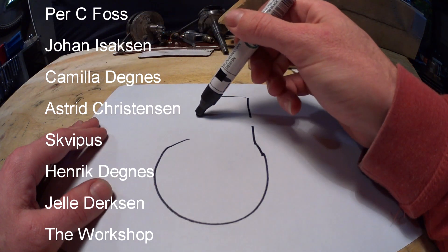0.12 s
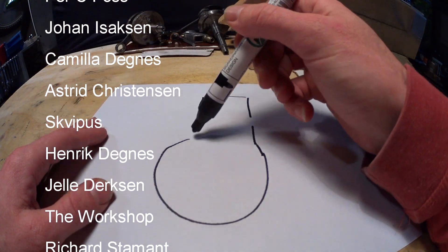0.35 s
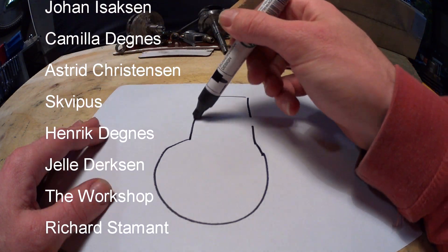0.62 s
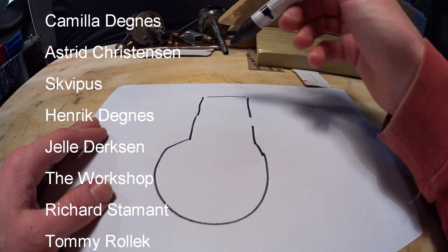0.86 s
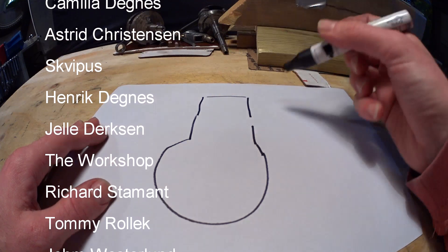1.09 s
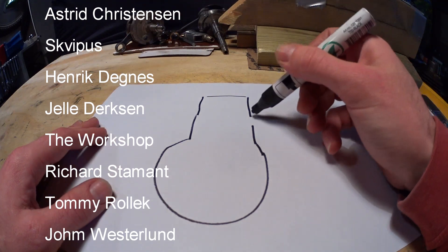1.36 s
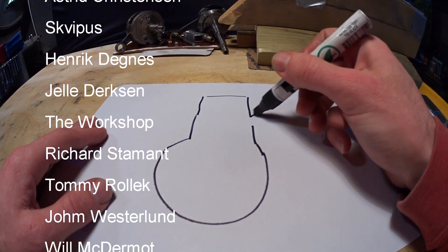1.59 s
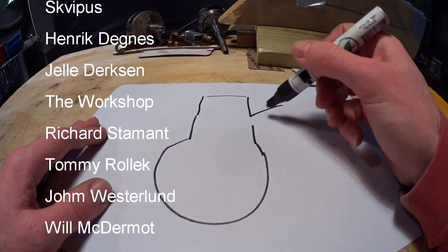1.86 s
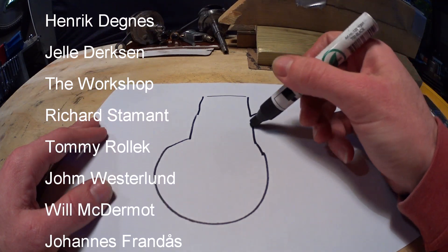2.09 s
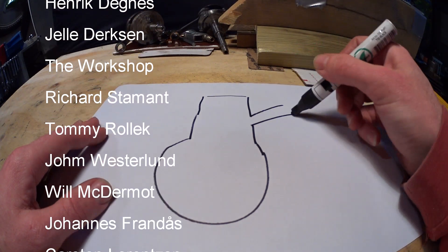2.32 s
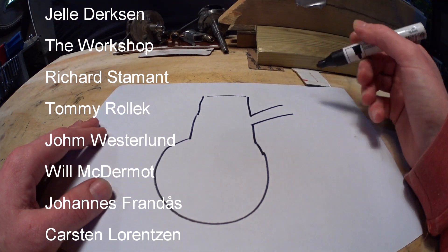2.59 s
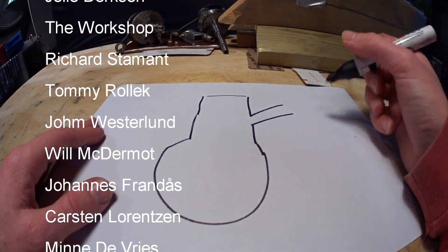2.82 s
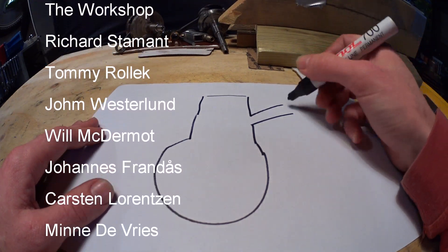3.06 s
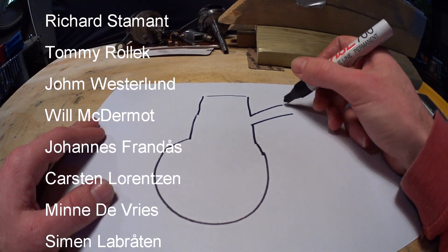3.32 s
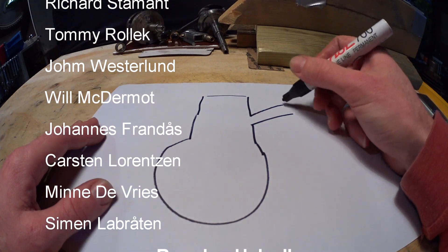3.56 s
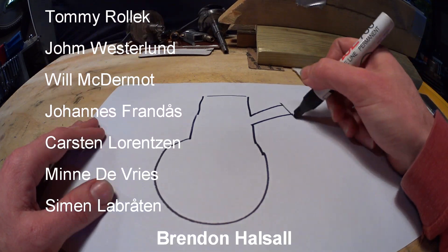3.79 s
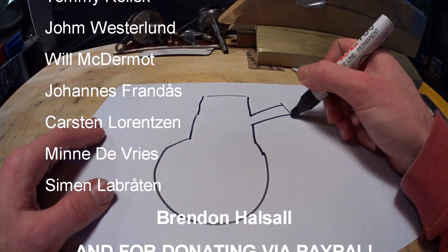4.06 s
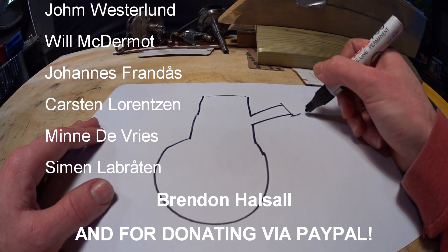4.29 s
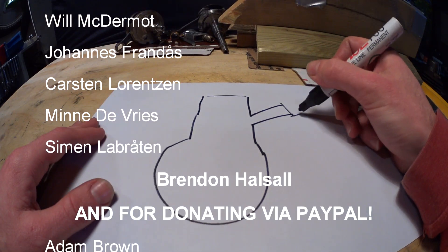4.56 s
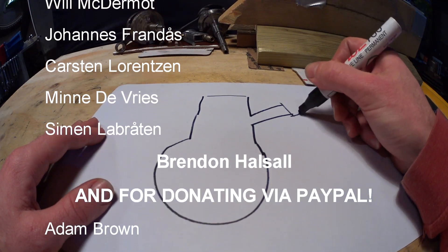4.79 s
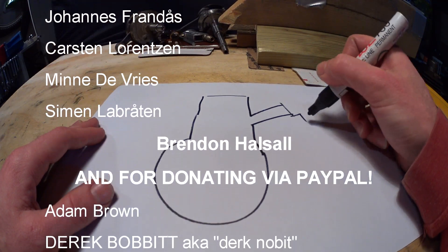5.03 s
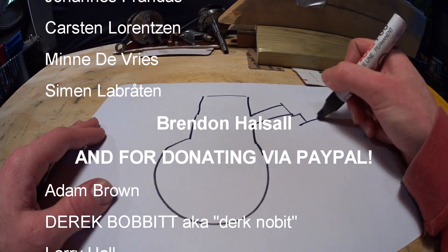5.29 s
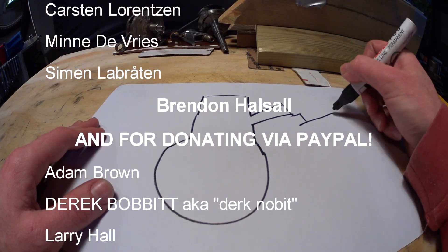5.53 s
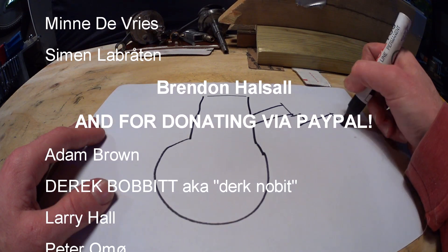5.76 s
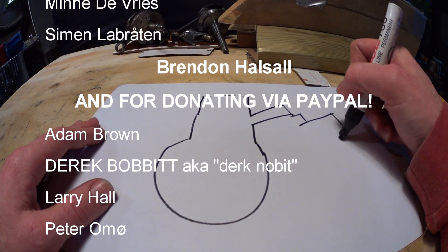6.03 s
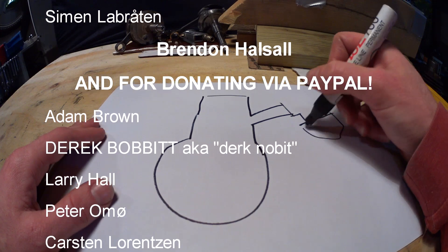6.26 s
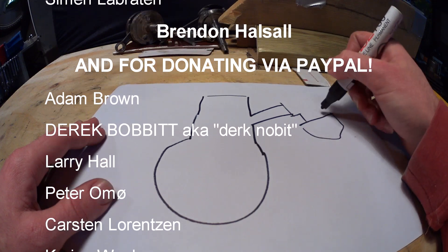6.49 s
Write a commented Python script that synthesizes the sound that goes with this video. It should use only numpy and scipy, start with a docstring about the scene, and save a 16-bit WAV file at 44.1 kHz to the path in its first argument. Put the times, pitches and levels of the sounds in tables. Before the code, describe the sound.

A quiet room with soft hiss, faint hum and wavering low rumble, heard close in stereo. After a tiny paper brush at 0.1 s, a marker nib lands at 0.5 s with a dull woody knock and a short faint hiss. Light skin and sleeve rustles with thin ticks follow until about 1.3 s. Another knock at 1.5 s leads to a clearer dry swish, and a third at 2.1 s to a similar stroke. From 2.4 to 3.3 s the hand brushes the sheet, strongest near 2.9 s, then small hollow knocks patter around 3.3 to 3.5 s. Landings at 3.6 and 4.05 s bring brief strokes; soft brushing fills the gap. A weak touch at 4.85 s precedes a firm knock at 5.13 s with a longer hiss. Another tap at 5.63 s starts linked strokes, with two strong bright swishes from 5.8 to 6.25 s. A last firm tap and clipped scratch come at 6.6 s.

```python
"""A felt-tip marker, heard close and in stereo, draws short strokes on paper lying on a wooden desk.
The nib lands with a knock that rings the desk top, then hisses as grains of friction through resonances
of nib, barrel and sheet; the grip sets which of them sing. Between strokes the hand brushes the sheet
in swells of grains, with small ticks, hollow knocks and a sleeve rustle.
The room is quiet: filtered hiss, faint mains lines, a wavering low rumble and a short reverberation."""
import sys
import numpy as np
from scipy import signal
from scipy.io import wavfile

SR = 44100
rng = np.random.default_rng(int(sys.argv[2]) if len(sys.argv) > 2 else 0)


def generate_wav(sig):
    """Save sig (samples, or channels by samples) to the path in sys.argv[1] as 16-bit PCM at SR."""
    pcm = np.round(np.clip(np.atleast_2d(sig).T, -1, 1) * 32767).astype(np.int16)
    wavfile.write(sys.argv[1], SR, pcm)


def linear_from_db(decibels):
    """Turn decibels (scalar or array-like) into linear amplitude factors; 0 gives 1."""
    return 10 ** (np.asarray(decibels, float) / 20)


N = 292383

# nib landings: (t/s, level/dB, tick level/dB re the landing, hardness/dB per octave, contact time/ms)
LANDINGS = [(.503, -21, -23, -1.5, 1.38), (1.52, -19, -27, 0.5, 1.76), (2.0931, -17, -22.5, -0.5, 0.98),
            (3.6231, -19.5, -18, -2, 1.16), (4.051, -16.5, -27, 0.1, 1.42), (4.843, -26.5, -29, 2, 3.2),
            (5.131, -14.5, -24, 0, 1.29), (5.633, -18, -21, -0.9, 1.22), (6.609, -14.5, -23.5, -1, 1.8)]
# modes of the desk top: (f/Hz, relative level/dB, t60/s)
DESK_MODES = [(113.4, -27, 0.63), (160, -1, 0.048), (239.5, -2.5, 0.046), (357, 8, 0.029),
              (412, -26, 0.035), (559, 1.5, 0.02), (742, -1, 0.027), (764.6, 0.5, 0.044), (927, -5, 0.034),
              (1017, -11, 0.062), (1390, 0.5, 0.0137)]
# resonances of nib, barrel and sheet: (f/Hz, width/Hz)
NIB_MODES = [(1600, 730), (2150, 274), (2700, 340), (3600, 560), (4300, 500), (4850, 490), (5400, 640),
             (6100, 695), (6750, 660), (7900, 890), (8800, 830), (9700, 1090), (10600, 1300)]
# stereo balance: (f/Hz, left minus right level/dB)
BALANCE = [(60, 0.0), (130, 0.0), (270, -1.5), (560, -2), (1190, -2), (2510, -2.5), (5290, -5.0),
           (11200, 0.5)]


def rms_one(x):
    """Scale to unit rms."""
    return x / np.sqrt(np.mean(x ** 2) + 1e-20)


def in_time(rows):
    """Columns of a table as curves over the whole length."""
    s, *columns = np.transpose(rows)
    return [np.interp(np.arange(N) / SR, s, c) for c in columns]


def at_hz(points, hz):
    """Read a spectrum on a log-frequency axis."""
    return np.interp(np.log(hz), np.log(np.array(points)[:, 0]), np.array(points)[:, 1])


def resonate(x, hz, width_hz):
    """Two-pole resonance with gain 1 on top."""
    r, w = np.exp(-np.pi * width_hz / SR), 2 * np.pi * hz / SR
    return signal.lfilter([(1 - r * r) / 2, 0, (r * r - 1) / 2], [1, -2 * r * np.cos(w), r * r], x + 1e-18)


def ring(x, hz, t60):
    """A unit click sets a dying cosine of height 1 ringing."""
    r, w = linear_from_db(-60 / (t60 * SR)), 2 * np.pi * hz / SR
    return signal.lfilter([1, -r * np.cos(w)], [1, -2 * r * np.cos(w), r * r], x + 1e-18)


def drift(rate_hz):
    """Slow chance with spread 1: noise at every 40th sample through two equal low-pass poles."""
    r = np.exp(-80 * np.pi * rate_hz / SR)
    white = rng.standard_normal(N // 40 + 2002)
    slow = signal.lfilter([1], [1, -2 * r, r * r], white)[2000:]  # settled part only
    return np.interp(np.arange(N) / 40, np.arange(len(slow)), rms_one(slow))


def friction(per_s, spread_db, flutter_db):
    """Fibres catch and let go: dense grains, one stream shared by both channels and one apart."""
    sizes = linear_from_db(spread_db * np.minimum(rng.exponential(1, (2, N)), 5))
    sizes = sizes * rng.choice([-1, 1], (2, N))
    happens = rng.random((2, N)) < per_s / SR
    return sizes * happens * linear_from_db(flutter_db * drift(110))


def stereo(pair, apart, pan_db, lag=0):
    """Shared and separate streams to left and right; the right may lag by a few samples."""
    both = pair[0] + apart * pair[1] * [[1], [-1]]
    left, right = both * linear_from_db(pan_db * np.array([[.5], [-.5]]))
    return np.array([left, np.roll(right, lag)])


def rumble_level():
    """A faint base, a swell after each landing as the desk wobbles, and a few swells of its own."""
    # swells of the rumble by itself: (crest t/s, level/dB, half length/s)
    own_swells = [(1.28, -63, 0.084), (2.83, -65.5, 0.093), (3.1, -63, 0.23), (3.94, -61.5, 0.085),
                  (5.45, -59.5, 0.056), (5.86, -56, 0.055), (6.09, -58, 0.15), (6.34, -63, 0.084)]
    wobble_db, wobble_s = -40, 0.096  # level re landing; time to the crest, also the half length
    t = np.arange(N) / SR
    rows = own_swells + [(s + wobble_s, db + wobble_db, wobble_s) for s, db, *_ in LANDINGS]
    return linear_from_db(-73) + sum(linear_from_db(db) * np.exp(-2 * ((t - s) / half) ** 2) for s, db, half in rows)


def room_tone():
    """Quiet room: hiss in third-octave bands, faint mains lines and a low sine of wavering pitch."""
    # room hiss: (f/Hz, relative level/dB per Hz)
    hiss_spectrum = [(12, -36), (20, -24), (48, -21.5), (101, -1), (119, -9.5), (192, -8), (326, -6.5),
                     (403, -6), (449, -6.5), (570, -6), (724, -6.5), (1740, -10.5), (3970, -19),
                     (9800, -22.5), (11500, -23), (15000, -68), (22000, -120)]
    # likeness of the two channels: (f/Hz, correlation)
    likeness = [(60, 0.32), (170, 0.59), (490, -0.47), (1380, -0.66), (3920, -0.13), (11200, 0.18)]
    # mains lines: (f/Hz, level/dB)
    mains_lines = [(200, -75), (299, -90)]
    hiss, edges = 0, 20 * 2 ** np.arange(0, 9.4, 1 / 3)
    white = rng.standard_normal((2, 2, N))
    for k, (low, high) in enumerate(zip(edges, edges[1:])):
        band = signal.butter(2, [low, high], "band", fs=SR, output="sos")
        mid, side = signal.sosfilt(band, white[k % 2])  # neighbouring bands use separate noise
        hz = np.sqrt(low * high)
        alike = np.clip(at_hz(likeness, hz), -.99, .99)
        pair = np.sqrt(1 + alike) * mid + np.sqrt(1 - alike) * side * [[1], [-1]]
        hiss = hiss + linear_from_db(at_hz(hiss_spectrum, hz)) * pair
    hum = sum(linear_from_db(db) * rms_one(resonate(white[0, 0], hz, 3.4)) for hz, db in mains_lines)
    pitch_hz = 46 + 3.04 * drift(4.53)
    rumble = np.sin(2 * np.pi * np.cumsum(pitch_hz) / SR) * np.sqrt(2)
    rumble = rumble * rumble_level() * linear_from_db(0.53 * drift(3.1))
    return linear_from_db(-57.5) * rms_one(hiss) + hum + rumble * linear_from_db([[.6], [-.6]])


def walls(x):
    """A short reverberation, other on each side; the hollow under the desk keeps the lows longer."""
    t = np.arange(round(.3 * SR)) / SR
    noise = rng.standard_normal((2, len(t))) * (t > .006)
    hollow = linear_from_db(4.5) * resonate(noise, 213, 250) * linear_from_db(-60 * t / 0.38)
    tail = noise * linear_from_db(-60 * t / 0.2) + hollow
    return signal.fftconvolve(x, tail / np.sqrt(len(t) / 20), axes=1)[:, :N]


def desk_rocking(near):
    """Rocking and twisting modes swell slowly and push the two sides in opposite ways."""
    # sideways rocking of the desk, set by where the nib stands: (t/s, signed share)
    rocking_share = [(.6, -0.49), (1.6, -0.29), (2.2, -0.37), (3.7, 0.5), (4.1, 0.95), (5.2, 0.97),
                     (5.65, 1.4), (5.9, 1.9), (6.6, 0.27)]
    rocking = near.mean(0) * in_time(rocking_share)[0]
    for hz in [820, 930, 1040]:
        rocking = resonate(rocking, hz, 160)
    twisting = resonate(resonate(near.mean(0), 240, 120), 347, 130)
    return (linear_from_db(22.0) * rocking + linear_from_db(-5.5) * twisting) * [[-1], [1]]


def sleeve():
    """The sleeve slides as the arm lifts: a faint narrow rustle of cloth, grains resonated twice."""
    # the rustle: (start t/s, length/s, level/dB, f/Hz, width/Hz)
    s, length, db, hz, width_hz = (.72, .45, -67.5, 2051, 350)
    part = np.clip((np.arange(N) / SR - s) / length, 0, 1)
    grains = friction(5000, spread_db=-2.5, flutter_db=1.5)
    rustle = rms_one(resonate(resonate(grains, hz, width_hz), hz, width_hz))
    return linear_from_db(db) * stereo(rustle, 0.36, -1.5) * np.maximum(np.sin(np.pi * part), 0) ** 0.15


def brushing():
    """Skin on paper: short swells of grains, quick to start, through the sheet's resonances."""
    # hand brushing the sheet: (start t/s, length/s, level/dB, brightness/dB per octave)
    brushes = [(0.111, 0.028, -50, 0.5), (0.669, 0.042, -55.5, -3), (0.798, 0.1, -56, -3),
               (0.903, 0.063, -57.5, -2), (0.957, 0.16, -55.5, -3), (1.096, 0.052, -61, -4),
               (1.147, 0.087, -61, 0), (1.212, 0.1, -64.5, -2), (1.444, 0.028, -68, 16),
               (2.427, 0.051, -64.5, 6), (2.669, 0.11, -57.5, 2), (2.762, 0.055, -61, 3.),
               (2.9, 0.091, -46.5, 2), (3.02, 0.18, -50.5, 1.5), (3.197, 0.05, -59, 3.),
               (3.281, 0.055, -58.5, -1), (3.828, 0.047, -54.5, 1), (3.881, 0.078, -59.5, 1),
               (3.952, 0.012, -63, 7), (3.996, 0.039, -50.5, 2), (4.162, 0.11, -50.5, -0.5),
               (4.313, 0.053, -58, 1.), (4.531, 0.02, -67, 9), (4.631, 0.043, -62, -1),
               (4.723, 0.045, -69, 6), (5, 0.012, -56.5, 0), (5.095, 0.053, -56, 0.5),
               (6.255, 0.23, -64, -3)]
    # colour of skin on paper: (f/Hz, relative level/dB)
    skin_spectrum = [(290, -43), (500, -13), (768, -10), (1210, -29), (1400, -7.5), (3380, -13), (7990, -7),
                     (9580, -1.5), (11200, -15), (14600, -41), (22000, -120)]
    grains, out = rms_one(friction(6000, spread_db=1.5, flutter_db=2.5)), np.zeros((2, N))
    for s, length, db, bright_db in brushes:
        span = slice(round(s * SR), round((s + length) * SR))
        part = np.linspace(0, 1, span.stop - span.start)
        sound = 0
        for j, (hz, width_hz) in enumerate([(800, 1700)] + NIB_MODES):
            gain = (-1) ** j * linear_from_db(at_hz(skin_spectrum, hz) + bright_db * np.log2(hz / 6000))
            pair = resonate(grains[:, span], hz, 0.88 * width_hz)
            sound = sound + gain * stereo(pair, 0.54, at_hz(BALANCE, hz))
        out[:, span] += linear_from_db(db) * rms_one(sound) * np.sin(np.pi * part ** 0.75) ** 0.85
    return out


def small_contacts(rows, cycles, rise, others_db):
    """Each contact rings briefly at its own pitch, with a weaker mode below and one above."""
    out = np.zeros(N)
    for s, db, hz in rows:
        turns = np.arange(round(3 * cycles * SR / hz)) * hz / SR  # time in cycles
        others = np.sin(2 * np.pi * 0.49 * turns) + np.sin(2 * np.pi * 1.47 * turns)
        shape = np.sin(2 * np.pi * turns) + linear_from_db(others_db) * others
        shape = shape * linear_from_db(-60 * turns / cycles) * (1 - np.exp(-turns / rise))
        out[round(s * SR):][:len(shape)] += linear_from_db(db) * shape / np.abs(shape).max()
    return out


def paper_ticks():
    """Paper ticks: high contacts that die by 60 dB within 12 cycles."""
    # ticks of the sheet: (t/s, peak level/dB, f/Hz)
    tick_rows = [(0.1176, -37, 8700), (0.5017, -28.5, 10800), (0.825, -41, 3620), (0.844, -31, 10600),
                 (0.877, -42, 8100), (0.9351, -42, 3730), (1.1584, -49, 5800), (1.5182, -34, 9700),
                 (1.7774, -49, 6720), (2.615, -39, 9710), (2.6763, -48, 3880), (2.7014, -42, 9200),
                 (2.7434, -38, 11000), (3.1971, -37, 10200), (3.595, -41.5, 4300), (3.913, -39, 8600),
                 (3.955, -44, 9600), (5.0005, -39, 9430), (5.5238, -45, 9890)]
    return small_contacts(tick_rows, cycles=12.0, rise=0.79, others_db=-12)


def hand_knocks():
    """The hand settles: small hollow knocks that die by 60 dB within 11 cycles."""
    # knocks of the hand: (t/s, peak level/dB, f/Hz)
    knock_rows = [(3.283, -44.5, 744), (3.358, -43, 736), (3.371, -40, 740), (3.411, -55, 694),
                  (3.444, -40, 654), (3.451, -39.5, 690), (3.489, -53, 560)]
    return small_contacts(knock_rows, cycles=11.0, rise=0.43, others_db=-14)


def landings():
    """A soft felt blow and its echo from the desk edge ring the top; a thin tick comes with the touch."""
    out, tick, t = np.zeros(N), np.zeros(N), np.arange(round(.25 * SR)) / SR
    chance = rng.standard_normal((len(LANDINGS), len(DESK_MODES)))
    for (s, level_db, tick_db, hard_db, contact_ms), spread in zip(LANDINGS, chance):
        blow = -np.sin(np.pi * np.minimum(1000 * t / contact_ms, 1)) ** 2
        blow = blow / -blow.sum()  # felt spreads one push over the contact time
        echo = np.roll(blow, round(0.00832 * SR))
        at = round((s + .0024) * SR)
        for (hz, db, t60), own in zip(DESK_MODES, spread):
            both = blow + 0.29 * echo * min(1, 420 / hz) ** 2  # the echo is dull
            gain = linear_from_db(level_db + db - 7.5 + hard_db * np.log2(hz / 350) + 0.24 * own)
            out[at:at + len(t)] += gain * ring(both, hz, t60)[:N - at]
        tick[at - round(.001 * SR)] = linear_from_db(level_db + tick_db)  # 1 ms ahead of the blow
    tick = signal.lfilter([1], [1, -linear_from_db(-60 / (0.015 * SR))], tick) * rng.standard_normal(N)
    return out + resonate(tick, 5300, 14000)


def sheet_scatter(sound):
    """The loose sheet adds many thin modes: a short dying scatter, partly other in each channel."""
    t = np.arange(500) / SR
    scatter = rng.standard_normal((2, 2, 500)) * linear_from_db(-14.5 - 60 * t / 0.029)
    scatter = scatter * np.minimum(t / 0.0011, 1)  # it builds up first
    # as the nib travels one set of modes gives way to another
    turn = np.linspace(0, np.pi / 2, sound.shape[1])
    out = 0
    for share, one in zip([np.cos(turn), np.sin(turn)], scatter):
        out = out + share * signal.fftconvolve(sound, stereo(one, 0.9, 0), axes=1)[:, :len(turn)]
    return out / np.sqrt(20)


def strokes():
    """Nib hiss through the resonances of each grip, and the push that rings the desk."""
    # strokes: (start t/s, speed-up/s, travel/s, slow-down/s, hiss level/dB, gain by the end of travel/dB)
    stroke_rows = [(0.52, 0.025, 0.089, 0.042, -36, 3.5), (1.568, 0.033, 0.078, 0.092, -26.5, -2.5),
                   (2.128, 0.045, 0.12, 0.046, -30.5, -0.5), (3.684, 0.024, 0.057, 0.053, -32.5, -1.5),
                   (4.065, 0.023, .058, 0.029, -38, 2), (4.856, 0.032, 0.036, 0.037, -38.5, 4.5),
                   (5.181, 0.066, 0.17, .065, -32, -2), (5.65, 0.022, 0.062, 0.1, -39, 6),
                   (5.798, 0.081, 0.034, 0.094, -25.5, 0.8), (6.004, 0.075, .13, 0.06, -24.5, 1.5),
                   (6.616, 0.016, .02, .02, -27, .6)]
    # grip of each stroke: (low resonances/dB, middle ones/dB, top ones at full speed/dB, favoured f/Hz,
    # its lift/dB, push before the desk/dB re hiss)
    grip_rows = [(-4.5, 4.5, 8.5, 3340, 6.5, -12.5), (1.5, 1, 7, 6330, 8, -22), (0.5, 1, 7, 6000, 2, -23.5),
                 (-3, -1, 7, 6100, 2.5, -18.5), (5, 4, 4, 7600, 7.5, -20), (-6, 0.5, 5.5, 9400, 2, -21),
                 (1.5, 2, 5, 7200, 1.5, -23.5), (1.2, 1, 6.5, 6080, 5, -18), (3, 1.2, 2, 6500, 2.5, -18.5),
                 (-0.5, -2.5, 11.5, 2470, 9, -19), (4, .6, 12.5, 2900, 13, -22)]
    # mean strength of each nib resonance: (level/dB)
    mode_levels = [-10, -8, -8.5, -8, -2.5, -5.5, -0.5, -0.5, 0, -3.5, -5, -2, -7.5]
    rounding = 0.63  # how far speed-up and slow-down bulge
    favour_octaves, top_power = 0.16, 3.55  # breadth of the lift; how late the top colour arrives
    hiss, push = np.zeros((2, N)), np.zeros(N)
    fibres = friction(14000, spread_db=0.0, flutter_db=0.6)
    wander = [linear_from_db(1.74 * drift(8.3)) for mode in NIB_MODES]  # the travelling nib shifts the colour
    for stroke, grip in zip(stroke_rows, grip_rows):
        s, up, travel, down, db, gain_db = stroke
        low_db, middle_db, top_db, best_hz, best_db, press_db = grip
        corners = s + np.cumsum([0, up, travel, down])
        span = slice(round(s * SR), min(N, round(corners[-1] * SR)))
        speed = in_time(np.transpose([corners, [0, 1, linear_from_db(gain_db / 2), 0]]))[0][span]
        ease = in_time(np.transpose([corners, [0, 1, 1, 0]]))[0][span]
        speed = speed * (1 + rounding * (1 - ease))  # the hand starts and stops briskly
        sound, chance = 0, rng.standard_normal((len(NIB_MODES), 2))
        for j, ((hz, width_hz), own_db) in enumerate(zip(NIB_MODES, mode_levels)):
            lift_db = top_db * (speed / speed.max()) ** top_power * (hz > 8400)
            lift_db = lift_db + low_db * (hz < 3000) + middle_db * (3000 < hz < 5100)
            lift_db = lift_db + best_db * np.exp(-.5 * (np.log2(hz / best_hz) / favour_octaves) ** 2)
            pair = resonate(fibres[:, span], hz, width_hz) * wander[j][span] * linear_from_db(own_db + lift_db)
            # each mode reaches the two channels with its own balance and phase
            lag = round(.07 * chance[j, 1] * SR / hz)
            pan_db = at_hz(BALANCE, hz) + 1.1 * chance[j, 0]
            sound = sound + (-1) ** j * stereo(pair, 0.11, pan_db, lag)
        sound = sound + sheet_scatter(sound)
        hiss[:, span] += rms_one(sound) * linear_from_db(db) * speed ** 2  # loudness grows with the square of speed
        push[span] += rms_one(fibres[0, span]) * linear_from_db(db + press_db) * speed ** 2
    desk = sum((-1) ** j * linear_from_db(db) * ring(push, hz, t60) for j, (hz, db, t60) in enumerate(DESK_MODES))
    return hiss + linear_from_db(-28.0) * desk


def scene():
    """Close sounds on the desk, their reverberation and the room tone."""
    near = strokes() + landings() + brushing() + sleeve()
    near = near + hand_knocks() + paper_ticks()
    near = near + desk_rocking(near)
    # the close sounds carry no deep bass below about 95 Hz
    near = signal.sosfilt(signal.butter(2, 95, "high", fs=SR, output="sos"), near)
    return near + linear_from_db(-19.5) * walls(near) + room_tone()


def low_pass(x):
    """Removes everything above the highest recorded frequency."""
    return signal.sosfilt(signal.butter(12, 11750, fs=SR, output="sos"), x)


def record(dry):
    """The treble is cut steeply above 11.05 kHz by an elliptic low-pass."""
    mix = signal.sosfilt(signal.ellip(10, .5, 38, 11050, fs=SR, output="sos"), dry)
    return low_pass(mix)


dry = scene()
out = record(dry)
generate_wav(out)
```